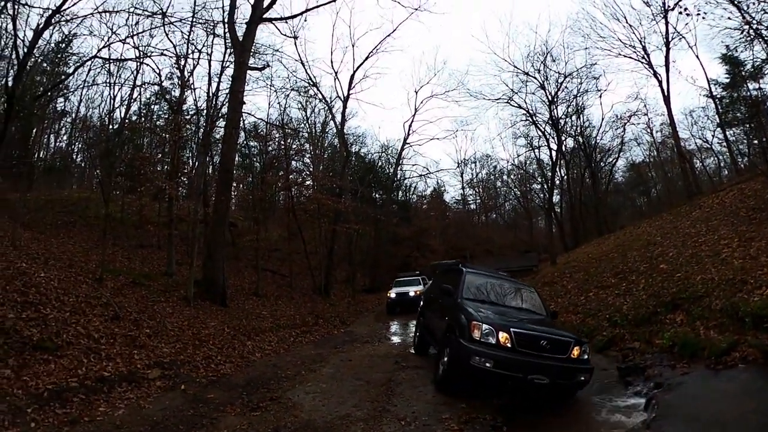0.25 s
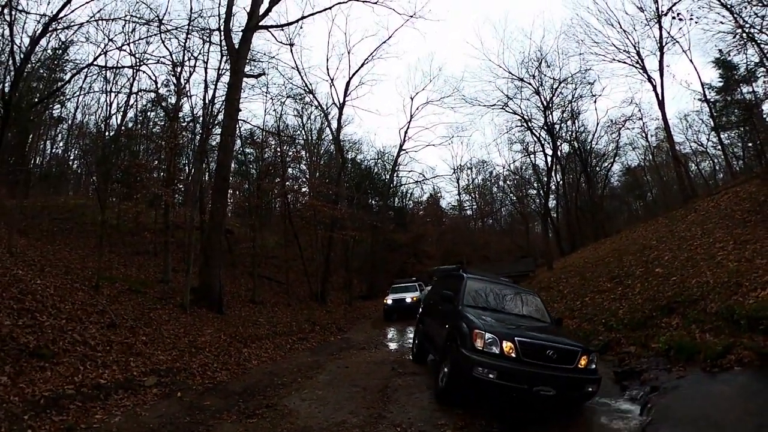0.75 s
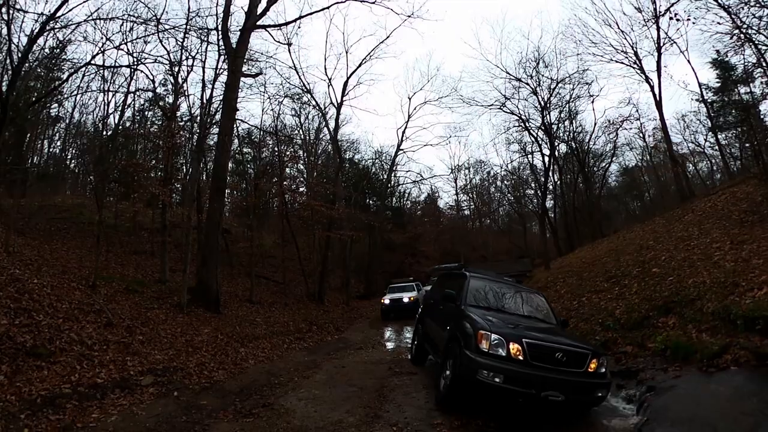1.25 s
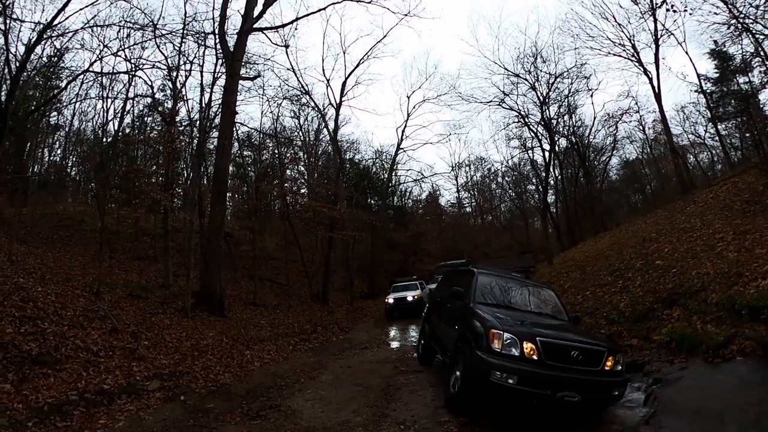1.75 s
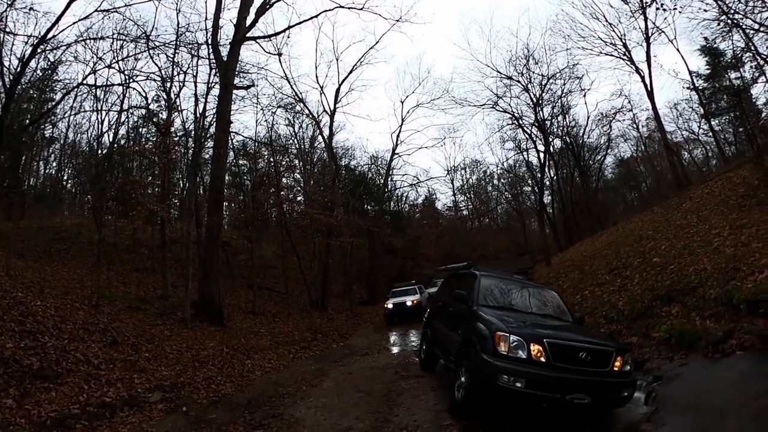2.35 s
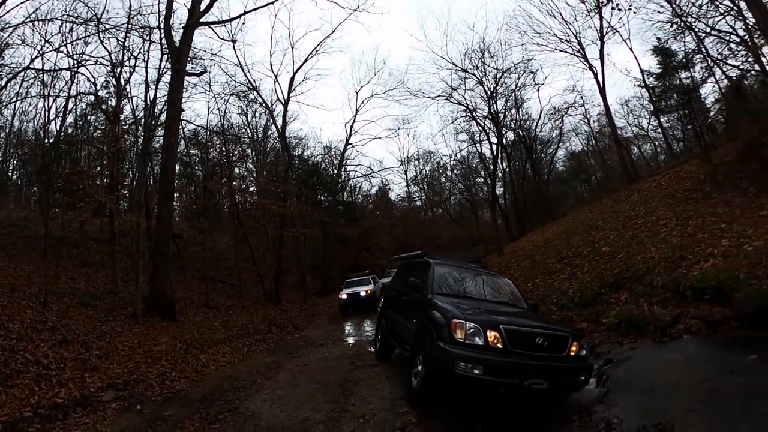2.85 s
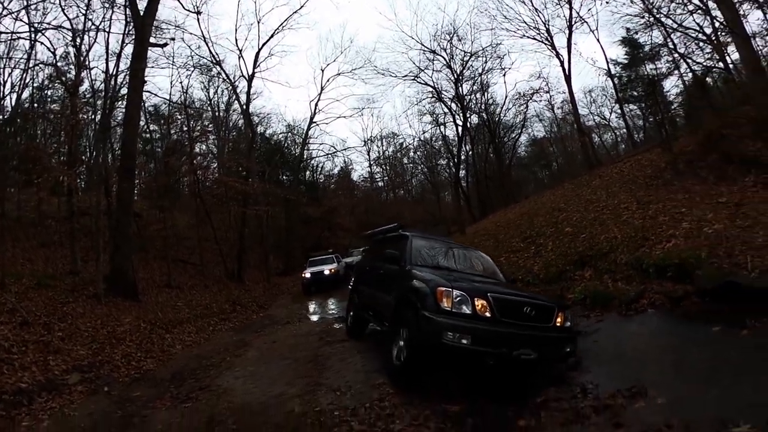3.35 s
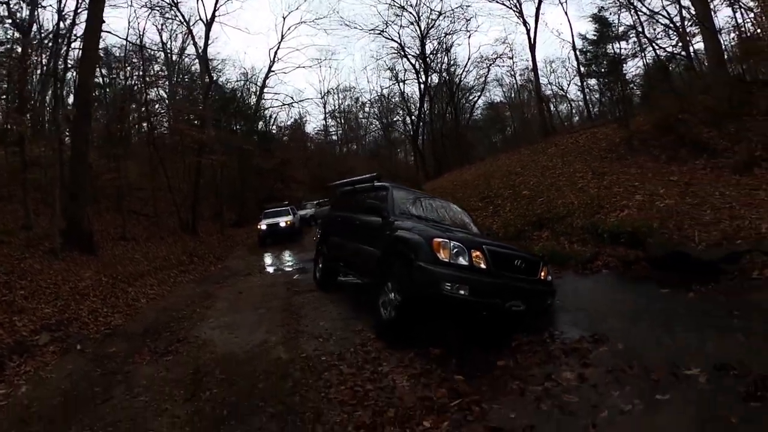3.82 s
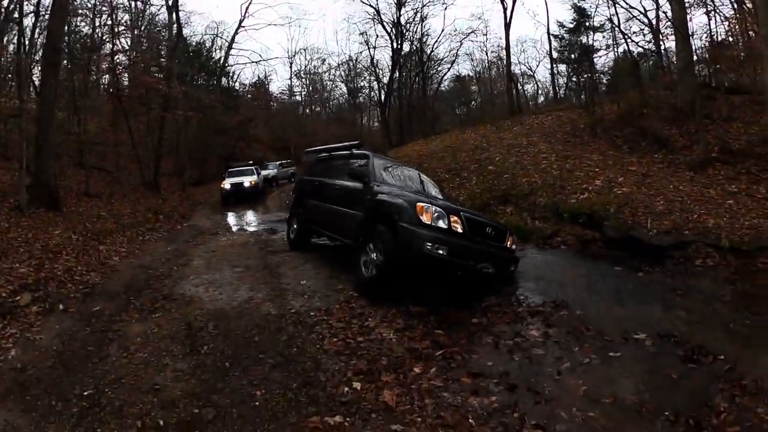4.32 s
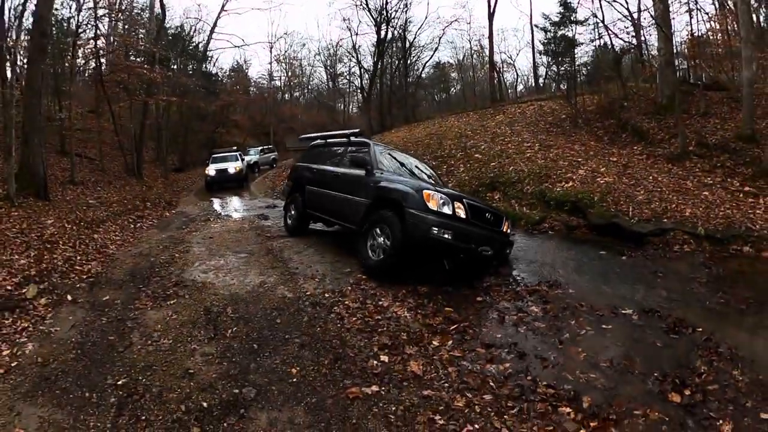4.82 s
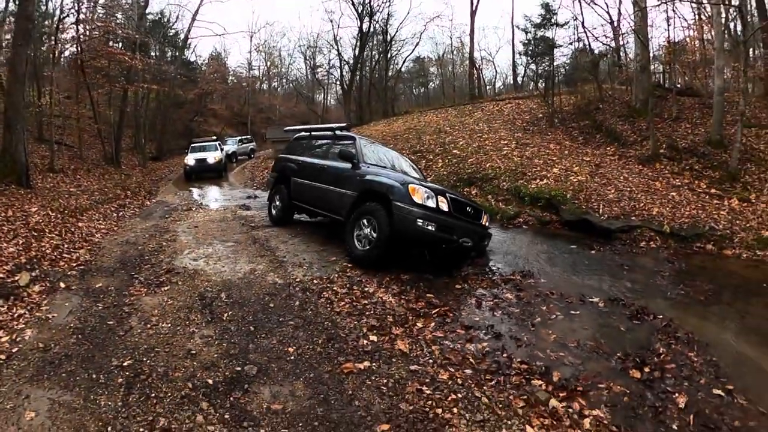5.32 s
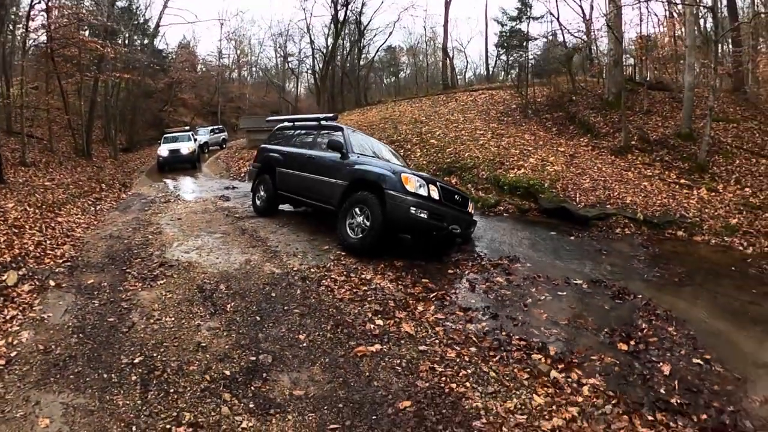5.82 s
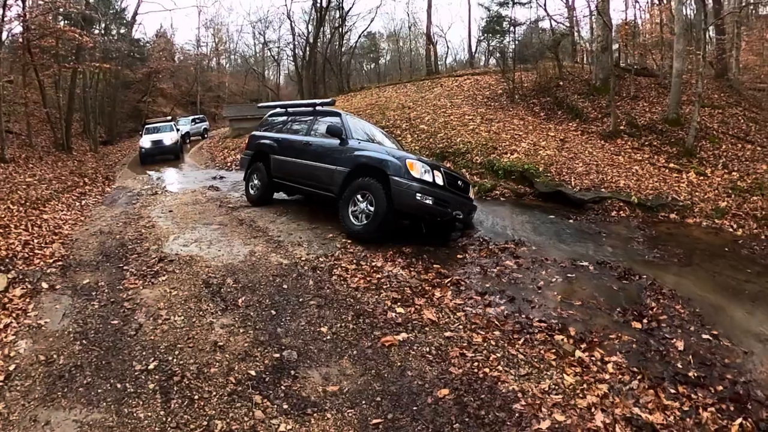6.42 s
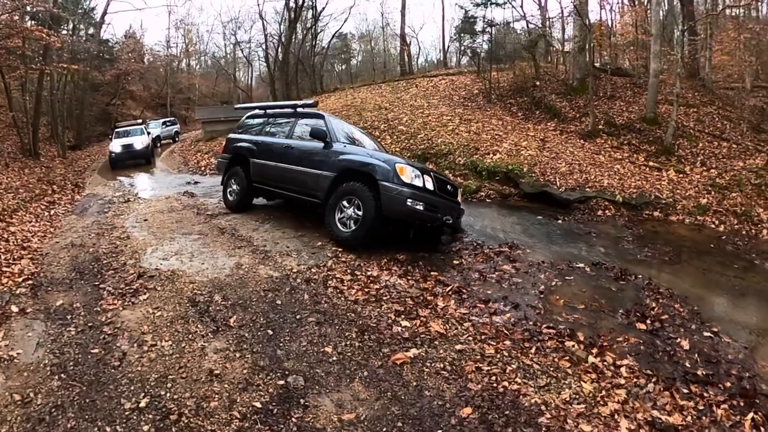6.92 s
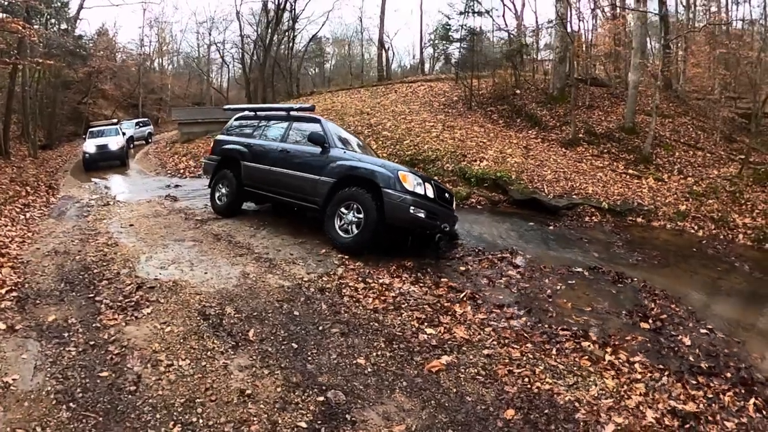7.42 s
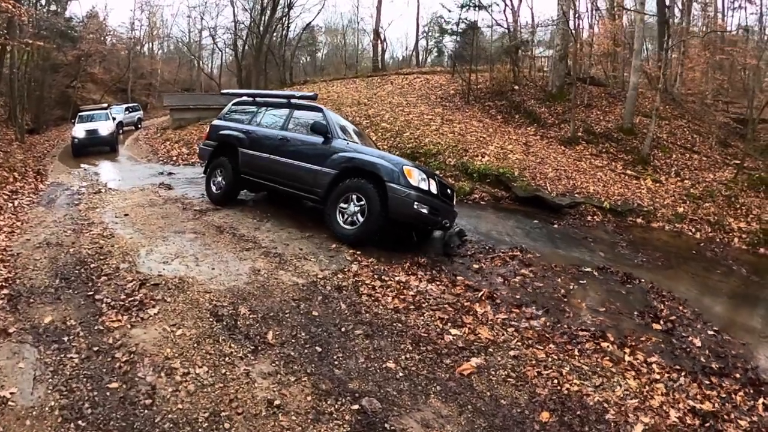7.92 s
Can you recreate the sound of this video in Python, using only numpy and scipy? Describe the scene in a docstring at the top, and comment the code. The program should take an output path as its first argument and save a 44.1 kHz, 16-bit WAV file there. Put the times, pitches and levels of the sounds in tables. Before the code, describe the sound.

A shallow creek gurgles, glugs and fizzes outdoors, heard from the bank, with a big V8 idling low underneath and a dull thud right at the start. At about 2.6 seconds the engine revs up into a deep, throbbing boom. Around 3.5 seconds a stone clacks sharply under a tyre, the suspension thuds and a rock rolls dully under water; more knocks and wet gravel crunches follow near 4 seconds. The throttle pushes again at 3.7 seconds and from 4.4 to 6, with a light exhaust rasp and rushing fan, while the creek grows quieter. Scattered stones knock and pebbles tick under the tread. The engine eases off after 6 seconds, then gives a last push from about 7.1 to 7.7. Gravel crunches build, peaking near 7.9 seconds with a few stone clacks and a brief hissing squirt of water.

```python
"""A big V8 throbs at idle over a gurgling forest creek, then the SUV crawls out in four pushes of throttle.
Firing pulses boom and rasp in the exhaust, and the fan rushes louder with the revs.
The creek is ringing bubbles and fizzing foam, steady until the body of the truck screens it.
Stones knock under the tyres, wet gravel crunches, and at the end the front digs in with a squirt."""
import sys
import numpy as np
from scipy import signal
from scipy.io import wavfile

SR = 44100
rng = np.random.default_rng(int(sys.argv[2]) if len(sys.argv) > 2 else 0)


def waveform_to_disk(signal):
    """Save audio, clipped to [-1, 1], as 16-bit WAV at the path in sys.argv[1]."""
    frames = np.transpose(np.atleast_2d(signal))
    scaled = np.clip(frames, -1, 1) * 32767
    samples = np.round(scaled).astype(np.int16)
    wavfile.write(sys.argv[1], SR, samples)


N = 360297
TIME = np.arange(N) / SR
IDLE_RPM, CRUISE_RPM = 589.6, 2000

# The driver's foot. Each row: press and release in seconds, rpm asked for at each, strain in dB.
THROTTLE_PUSHES = [(2.59, 3.461, 1094, 1028, 0), (3.694, 4.228, 1554, 1899, -4),
                   (4.389, 5.972, 1920, 2121, -2), (7.07, 7.746, 1723, 1622, -3.5)]

def throttle(travel_s=.28, off_load_db=-8, bark_db=11.5):
    """Revs and load lag behind the pedal; returns rpm, pedal (0-1) and the exhaust's effort in dB."""
    pedal, strain_db, asked_rpm = 0, 0, IDLE_RPM
    for press, release, first_rpm, last_rpm, db in THROTTLE_PUSHES:
        push = np.interp(TIME, [press, press + travel_s, release, release + travel_s], [0, 1, 1, 0])
        asked_rpm += push * (np.interp(TIME, [press, release], [first_rpm, last_rpm]) - IDLE_RPM)
        pedal = np.minimum(pedal + push, 1)
        strain_db += push * db
    rpm = lag(asked_rpm, up_s=.123, down_s=.428)
    load = lag(pedal, up_s=.0094, down_s=.52)
    speeding_up = np.maximum(asked_rpm / rpm - 1, 0)
    return rpm, pedal, off_load_db * (1 - load) + strain_db + bark_db * speeding_up

# The lope of the cross-plane V8. Each entry: relative strength in dB of one firing in the cycle.
FIRING_DB = [0, 4.5, -3.5, 3.5, 1.5, -0.5, -5.5, 6.5]

def firing_flow(cycle, rough_db=3, bank_lag_s=.001117):
    """Each firing sends a pulse and a puff of turbulence down the pipe."""
    firings = len(FIRING_DB) * cycle
    count = np.floor(firings).astype(int)
    cylinder = count % len(FIRING_DB)
    onsets = np.flatnonzero(np.diff(count)) + 1
    scatter_db = rough_db * rng.standard_normal(N)[:len(onsets)]
    pulses = np.zeros(N)
    pulses[onsets] = from_db(np.array(FIRING_DB)[cylinder[onsets]] + scatter_db)
    # the far bank has a longer way to the tailpipe, so its pulses come late
    far = np.isin(cylinder, [1, 3, 4, 6])
    pulses = pulses * ~far + np.interp(TIME - bank_lag_s, TIME, pulses * far)
    puffs = rng.standard_normal(N) * np.exp(-3 * (firings % 1))
    return rms_one(pulses / np.sqrt(np.gradient(cycle))) + .5 * rms_one(puffs)

# The fader ride of the firing tone, booming under load. Each row: time in seconds, level in dB.
BOOM_RIDE = [(0, -63), (2.6, -64), (2.75, -31.5), (2.92, -18.5), (3.25, -22), (3.5, -22.5), (3.63, -29.5),
             (3.92, -21.5), (4.1, -26.5), (4.27, -23), (4.48, -32), (4.78, -22.5), (5.05, -23), (5.2, -22),
             (5.45, -21.5), (5.58, -28.5), (5.73, -22.5), (5.89, -31), (6.05, -27), (6.18, -20.5),
             (6.3, -30), (6.5, -36.5), (7.1, -39.5), (7.22, -31), (7.3, -23.5), (7.45, -27.5), (8.17, -31)]
# The throb around the firing tone. Each row: multiple of the engine cycle, relative level in dB.
THROB_ORDERS = [(3, -1), (4, -15), (5, -1.5), (6, -16), (7, -15.5), (9, -20), (10, -17.5), (11, -17.5),
                (12, -17), (13, -18.5), (14, -16.5), (16, -11.5), (21, -15), (43, -20), (45, -18.5),
                (49, -20)]
# What the silencer lets through. Each row: frequency in Hz, gain in dB.
SILENCER_EQ = [(30, -44), (40, -40), (46, -34), (51, -29), (57, -25.5), (66, -24.5), (76, -22.5), (89, -28),
               (118, -18.5), (131, -24.5), (180, -35.5), (210, -29.5), (232, -27.5), (260, -36.5),
               (290, -38)]

def exhaust_tones(cycle, effort_db):
    """Eight firings a cycle boom; the uneven banks add tones that swell at the silencer's resonances."""
    cycle_hz = np.gradient(cycle) * SR
    boom_db, = in_time(BOOM_RIDE)
    out = tone(cycle, len(FIRING_DB), boom_db + 1.3 * drift(12.4))
    for order, db in THROB_ORDERS:
        waver_db = (.25 - .12 * db) * drift(6.9)   # faint tones waver most
        out += tone(cycle, order, effort_db + db + at_hz(SILENCER_EQ, order * cycle_hz) + waver_db)
    return out

# The hollow ring of the pipe. Each row: centre in Hz, width in Hz, relative level in dB.
PIPE_MODES = [(76.4, 44, 1), (136.5, 90, 1.5), (206, 49, 1), (418, 93, -11), (890, 300, -16),
              (1405, 99, -18)]

def exhaust_rasp(cycle, rasp_db, gap_hz, pipe_db=-2, growl_db=-4):
    """The firings ring in the pipe and growl in the gap under the body."""
    flow = firing_flow(cycle)
    pipe = sum((-1) ** k * from_db(db) * resonate(flow, hz, width)
               for k, (hz, width, db) in enumerate(PIPE_MODES))
    swirl = flow + .6 * rng.standard_normal(N)   # steady turbulence keeps the growl diffuse
    growl = swept_band(swirl, gap_hz, width_hz=190)
    return from_db(rasp_db) * (from_db(pipe_db) * rms_one(pipe) + from_db(growl_db) * growl)

# The singing edge of the growl. Each row: multiple of the engine cycle, relative level in dB.
GROWL_ORDERS = [(30, -14.5), (31, -9.5), (32, -14.5), (34, -12.5)]

def growl_tones(cycle, rasp_db, gap_hz, width_hz=65):
    """Clean high orders swell and beat as they pass the resonance of the gap under the body."""
    cycle_hz = np.gradient(cycle) * SR
    out = np.zeros(N)
    for order, db in GROWL_ORDERS:
        partial = tone(cycle + .0041 * drift(18), order, rasp_db + db + 2.5 * drift(10))
        out += partial / np.hypot(1, (order * cycle_hz - gap_hz) / width_hz)
    return out

def combustion_rumble(effort_db):
    """Unsteady combustion rumbles under the tones, heavier with effort."""
    return from_db(-37 + .58 * effort_db) * rms_one(cut(rng.standard_normal(N), [45, 140], "band"))

# The colour of the fan's rush. Each row: frequency in Hz, relative noise density in dB.
FAN_SPECTRUM = [(500, -14), (850, 3), (972, -6.5), (1140, -3.5), (1470, -7), (2040, -6), (2630, -11),
                (3520, -14.5), (4890, -21.5), (6160, -23.5), (9310, -35.5), (10600, -46.5), (12600, -38),
                (15500, -53.5)]
# The whir of intake and engine bay. Each row: centre in Hz, width in Hz, relative level in dB.
BAY_MODES = [(875, 200, -8), (1470, 140, -14.5), (2597, 440, -9.5), (3910, 190, -27), (4210, 230, -23),
             (6150, 520, -28.5), (7660, 240, -31), (8900, 1200, -32), (12300, 600, -37.5)]

def fan(cycle, fan_db, pulse_depth=.043):
    """Air rushes through the radiator and intake, pulsing with the firings, and whirs in the bay."""
    pulsing = 1 + pulse_depth * np.cos(2 * np.pi * len(FIRING_DB) * cycle)
    air = coloured(rng.standard_normal((2, N)), FAN_SPECTRUM, flicker_db=2)
    flow = rng.standard_normal(N)
    whir = sum(from_db(db) * rms_one(resonate(resonate(flow, hz, width), hz, width))
               for hz, width, db in BAY_MODES)
    return from_db(fan_db) * pulsing * bay_reflections(air + whir)

def intake_hiss(airflow):
    """Air hisses past the throttle plate as soon as the pedal is down."""
    hiss = cut(cut(rng.standard_normal(N), 5500, "high"), 9500, "low", order=4)
    return from_db(-68) * airflow * rms_one(bay_reflections(hiss))

# Tight slaps inside the engine bay. Each row: delay in seconds, gain in dB.
BAY_ECHOES = [(.00231, -26.5), (.00589, -15)]

def bay_reflections(x):
    """Nearby surfaces comb the treble."""
    treble = cut(x, 2700, "high")
    return x + sum(from_db(db) * np.interp(TIME - s, TIME, treble) for s, db in BAY_ECHOES)

# Stone hits. Each row: start in seconds, ring level in dB, low-end weight in dB, pitch ratio,
# grit level in dB; all levels are relative.
STONE_KNOCKS = [(0.726, -30, -17, 1.36, -19.5), (3.417, -1.5, -11, 0.93, -20),
                (3.474, -15.5, -12, 0.8, -38), (3.597, -24, -9, 0.96, -36), (3.875, -20.5, -27, 0.9, -19),
                (3.908, -8, -16.5, 0.86, -17.5), (4.565, -29, -5, 0.95, -29), (4.704, -25, -1, 0.83, -29),
                (4.946, -25, -8, 0.74, -29), (5.436, -31, -4, 0.73, -28), (5.472, -27, -8, 0.53, -28),
                (5.848, -22, -2, 0.58, -30), (7.051, -22.5, -15, 0.67, -33), (7.072, -18.5, -36, 0.55, -27),
                (7.196, -24.5, -20, 0.68, -16), (7.679, -13, -27, 0.92, -36), (7.852, -16, -9, 1, -19),
                (7.866, -15.5, -6, 1.083, -27), (7.882, -15.5, -9, 0.88, -25)]
# The voice of a stone. Each row: Hz at pitch ratio 1, relative level in dB, seconds to fall 60 dB.
STONE_MODES = [(349, -7, 0.05), (620, 0, 0.0052), (937, -3, 0.053), (1340, -1.5, 0.0096), (1494, 5, 0.011),
               (1710, -1.5, 0.0027), (2410, -21, 0.016)]

def stone_knocks(ring_db=-7, slip_s=.00187, slip_db=-2):
    """Wet stones clack under the tyres with a burst of grit, slip and catch again."""
    clacks, t = np.zeros(N), TIME[:SR // 100]
    for s, db, weight_db, pitch, grit_db in STONE_KNOCKS:
        grit = rng.standard_normal(len(t)) * np.exp(-t / .0015)
        add(clacks, s, from_db(grit_db) * cut(grit, [700, 2800], "band", order=3))
        for k, (hz, mode_db, t60) in enumerate(STONE_MODES):
            colour_db = (weight_db + 7.5) * np.log2(1500 / hz) / 2
            for delay, contact_db in [(0, 0), (slip_s, slip_db)]:
                level_db = db + ring_db + mode_db + colour_db + contact_db + rng.standard_normal()
                add(clacks, s + delay, (-1) ** k * from_db(level_db) * ping(pitch * hz, t60))
    return cut(clacks, 3200, "low")

# Suspension jolts. Each row: start in seconds, level in dB, brightness in dB per octave.
JOLTS = [(.087, -17, 4.5), (3.419, -26.5, 24), (3.444, -24, 7), (3.476, -14, -3), (3.499, -20, 5),
         (3.565, -22.5, 7), (7.029, -24.5, -4), (7.842, -25, -1), (7.88, -26, -6)]
# The boom of the chassis. Each row: pitch in Hz, relative level in dB, seconds to fall 60 dB.
CHASSIS_MODES = [(36, -11, 0.37), (88.4, -4, 0.32), (172.5, -2, 0.094), (319, -9.5, 0.021)]

def chassis_thuds():
    """Each jolt of the suspension sets the chassis ringing low and dull."""
    thuds = np.zeros(N)
    for s, db, tilt_db in JOLTS:
        for hz, mode_db, t60 in CHASSIS_MODES:
            add(thuds, s, from_db(db + mode_db + tilt_db * np.log2(hz / 150)) * ping(hz, t60))
    return cut(thuds, 1000, "low")

# One small bright splash in the creek, then gravel crunches.
# Each row: peak time and fall in seconds, level in dB, brightness in dB per octave.
SPLASH_AND_CRUNCHES = [(.572, 0.023, -47, 8), (3.477, 0.014, -44, -4), (3.616, 0.015, -42, 10.5),
                       (3.826, 0.042, -33, 3), (3.919, 0.035, -34.5, -0.5), (4.04, 0.076, -35.5, 3.5),
                       (6.509, 0.029, -47, -10.5), (6.95, 0.046, -43, 2.5), (7.06, 0.06, -41, 3.5),
                       (7.399, 0.035, -38.5, 4), (7.501, 0.0092, -35.5, 3.5), (7.701, 0.042, -34.5, 4.5),
                       (7.79, 0.048, -36, 4), (7.85, 0.037, -25, 0.5), (7.882, 0.033, -28, 4.5)]
# The colour of crushed gravel. Each row: frequency in Hz, relative noise density in dB.
GRAVEL_SPECTRUM = [(330, -8), (700, 5.5), (1300, 13.5), (1700, 6), (2100, -24), (3200, -1.5), (4200, -13.5),
                   (5200, -15.5), (6500, -22.5), (9000, -35.5), (12000, -55), (15500, -49)]
# The clang of the skid plate. Each row: centre in Hz, width in Hz, relative level in dB.
SKID_PLATE_MODES = [(390, 54, 2), (540, 84, 22), (976, 180, 10), (1410, 140, -11)]

def splash_and_crunches(rise_share=.77):
    """Bursts of tiny clicks: a small splash, then tyres crunching wet gravel that rings the skid plate."""
    bursts = np.array([from_db(db) * swell(s, rise_share * fall, fall)
                       for s, fall, db, _ in SPLASH_AND_CRUNCHES]) + 1e-9
    level = bursts.sum(axis=0)
    tilt_db = np.array(SPLASH_AND_CRUNCHES)[:, -1] @ bursts / level   # the loudest burst leads the colour
    collisions = [grains(per_s=2200, spread_db=4) for _ in range(2)]
    crush = coloured(collisions, GRAVEL_SPECTRUM, flicker_db=2, tilt_db=tilt_db)
    ring = sum(from_db(db) * resonate(collisions[0], hz, width) for hz, width, db in SKID_PLATE_MODES)
    plate = from_db(-tilt_db) * rms_one(ring)   # coarse, dull stones shake the plate most
    return level * (from_db(-5) * crush + .5 * cut(plate, 2400, "low"))

def tread_crackle(level_db):
    """Once the wheels turn, single stones crack under the tread."""
    turning = np.interp(TIME, [3.7, 3.9], [0, 1])
    cracks = coloured([grains(per_s=240, spread_db=2)], GRAVEL_SPECTRUM, flicker_db=2)
    return turning * from_db(level_db) * cracks

# The lurches of a rock. Each row: peak time, rise and fall in seconds, level in dB.
ROCK_LURCHES = [(3.505, 0.056, 0.017, -24.5), (3.575, 0.029, 0.064, -26.5)]
# Its muffled colour. Each row: frequency in Hz, relative noise density in dB.
ROCK_SPECTRUM = [(82, -32), (140, 6.5), (318, -1), (346, -3), (673, -1), (934, -68), (1010, -27),
                 (1400, -27.5), (1820, -41), (3080, -120)]

def rolling_rock():
    """A rock rolls over under water in a cluster of dull bumps."""
    return swells(ROCK_LURCHES) * coloured([grains(per_s=220, spread_db=1.5)], ROCK_SPECTRUM)

# Drops and flicked pebbles. Each row: start in seconds, relative level in dB, pitch in Hz.
PEBBLE_TICKS = [(0.573, -28, 3850), (3.807, -29, 5300), (3.876, -34, 6200), (4.0, -34, 6000),
                (4.073, -29, 3800), (4.119, -33, 3600), (4.314, -34, 5860), (4.518, -29, 3700),
                (4.777, -26, 4000), (4.84, -32, 3500), (5.523, -29, 4300), (5.565, -30, 5300),
                (5.666, -35, 3800), (5.866, -33, 5400), (7.118, -40, 5600), (7.728, -38, 5900),
                (7.76, -25, 3700)]

def pebbles(trim_db=-12, decay_s=.003, width_share=.12):
    """Small stones and drops tick with a dry burst around their own pitch."""
    out, t = np.zeros(N), TIME[:SR // 25]
    for s, db, hz in PEBBLE_TICKS:
        burst = rms_one(resonate(rng.standard_normal(len(t)), hz, width_share * hz))
        add(out, s, from_db(db + trim_db) * burst * np.exp(-t / decay_s))
    return cut(out, 8000, "low")

# The sweep of the water jet. Each row: time in seconds, pitch in Hz, level in dB.
JET_SWEEP = [(7.72, 3383, -81), (7.76, 3550, -50), (7.83, 4240, -55), (7.895, 5360, -41.5),
             (7.94, 5490, -78)]

def squirt():
    """A thin jet hisses from under the front tyre, rising in pitch as the tyre closes its gap."""
    hz, db = in_time(JET_SWEEP)
    gate = (TIME > JET_SWEEP[0][0]) * (TIME < JET_SWEEP[-1][0])
    return from_db(db) * swept_band(rng.standard_normal(N), hz, width_hz=700) * gate

# The sheen on the last crunch. Each row: peak time, rise and fall in seconds, level in dB.
MIST_PUFFS = [(7.868, .03, 0.033, -59)]

def mist():
    """A brief cloud of fine drops hisses as the front digs in."""
    return swells(MIST_PUFFS) * rms_one(cut(grains(per_s=6000, spread_db=7), [6500, 13000], "band"))

# The creek's faders, dipping as the truck screens it. Each row: time in seconds, gurgle and spray in dB.
CREEK_RIDE = [(0, -34, -54), (.6, -35.5, -49.5), (1.1, -34, -49), (1.9, -35.5, -50.3), (3.45, -34.5, -49.5),
              (3.75, -39.5, -58), (4.3, -42.5, -59), (6.1, -42, -69), (6.7, -43.5, -61), (8.17, -50, -59.5)]

def creek(gap_hz):
    """Water tumbles over rocks: fizzing foam, gurgling bubbles and a few gulps."""
    gurgle_db, spray_db = in_time(CREEK_RIDE)
    return spray(spray_db, gap_hz) + from_db(gurgle_db) * gurgle() + gulps()

# The colour of the gurgle. Each row: bubble pitch in Hz, relative density in dB.
GURGLE_SPECTRUM = [(76, -46), (130, -40), (161, -1.5), (226, 2), (329, -7.5), (394, -6), (462, -47),
                   (529, -17.5), (667, -10), (776, -11), (1100, -25.5), (1430, -59), (2420, -120)]

def gurgle(count=7000, ring_cycles=22):
    """Bubbles of all sizes ring briefly and rise in pitch as they surface."""
    out = np.zeros(N)
    for when, pitch, faintness in rng.random((count, 3)):
        hz = 120 * 8.5 ** pitch
        level_db = at_hz(GURGLE_SPECTRUM, hz) + 20 * np.log10(hz) - 2.4 * np.log(faintness + .16)
        add(out, when * N / SR, from_db(level_db) * ping(hz, ring_cycles / hz, glide=.17))
    return rms_one(cut(out, 927, "low", order=4))

# The fizz of foam. Each row: frequency in Hz, relative noise density in dB.
FOAM_SPECTRUM = [(900, -6), (1200, 5.5), (1800, 7), (2500, -1), (3000, -7.5), (3500, 1.5), (4300, -10.5),
                 (5400, -11), (6400, -5), (7700, -6), (8500, -14.5), (9300, -25), (11000, -31.5),
                 (15000, -49.5)]
# Its ring under the body. Each row: ratio to the gap's pitch, width in Hz, relative level in dB.
UNDERBODY_MODES = [(3.15, 490, -9), (4.55, 478, -15)]

def spray(spray_db, gap_hz):
    """Foam bursts in thousands of tiny clicks, and the spray rings in the gap under the body."""
    pops = [grains(per_s=12000, spread_db=5) for _ in range(2)]
    ring = sum(from_db(db) * swept_band(grains(per_s=9000, spread_db=3.5), ratio * gap_hz, width)
               for ratio, width, db in UNDERBODY_MODES)
    return from_db(spray_db + .65 * drift(3)) * (coloured(pops, FOAM_SPECTRUM, flicker_db=2) + ring)

# Big single bubbles. Each row: start in seconds, level in dB, starting pitch in Hz.
AIR_POCKETS = [(.047, -26, 760), (.089, -22, 597), (.234, -27.5, 720), (.257, -29, 624), (1.008, -26, 650),
               (1.044, -25, 670), (1.072, -18.5, 674), (1.128, -19, 745), (3.497, -23, 660),
               (3.548, -20, 500), (3.568, -20, 560), (3.595, -17.5, 650)]

def gulps():
    """Large air pockets ring in the water with a short upward chirp."""
    out = np.zeros(N)
    for s, db, hz in AIR_POCKETS:
        add(out, s, from_db(db) * ping(hz, t60=.025, glide=.069))
    return cut(out, 1050, "low")

# Water glugs and, last, one brief tyre groan. Each row: start and length in seconds,
# first and last pitch in Hz before detuning, level in dB.
GLUGS_AND_GROAN = [(.09, 0.15, 336.7, 380, -39), (.58, 0.09, 326, 448, -37), (.7, 0.26, 245, 200.6, -40),
                   (.98, .24, 210.2, 267, -34.5), (1.6, 0.16, 226.7, 161, -36.5),
                   (1.73, 0.13, 166.6, 215.6, -36), (2.03, 0.22, 256, 234.7, -36),
                   (6.43, .15, 850, 895, -46)]

def glugs_and_groan(detune=.96):
    """Gliding, fluttering tones: water glugs between the rocks, and a tyre scrubs once on stone."""
    out = np.zeros(N)
    for s, length, first_hz, last_hz, db in GLUGS_AND_GROAN:
        hz = np.linspace(first_hz, last_hz, int(length * SR))
        glide = tone(np.cumsum(hz) / SR, detune, db + 3 * drift(33)[:len(hz)])
        add(out, s, np.hanning(len(hz)) * glide)
    return out

def forest(x, t60=.94, wet_db=-27):
    """Banks and tree trunks scatter a faint, dull tail."""
    t = TIME[:SR]
    tail = cut(rng.standard_normal(SR), 3000, "low") * np.exp(-np.log(1000) * t / t60) * (t > .008)
    return x + from_db(wet_db) * signal.fftconvolve(x, tail / np.linalg.norm(tail))[:N]

def from_db(db):
    """Decibels to gain."""
    return 10 ** (np.asarray(db) / 20)

def rms_one(x):
    """Scale to rms 1."""
    return x / np.sqrt(np.mean(x ** 2) + 1e-20)

def in_time(rows):
    """One automation curve for each column after the time."""
    s, *columns = np.transpose(rows)
    return [np.interp(TIME, s, column) for column in columns]

def at_hz(spectrum, hz):
    """Read a spectrum's dB on a log-frequency axis."""
    points_hz, db = np.transpose(spectrum)
    return np.interp(np.log(hz), np.log(points_hz), db)

def cut(x, hz, kind, order=2):
    """Butterworth filter."""
    sos = signal.butter(order, np.clip(hz, 10, .45 * SR), kind, fs=SR, output="sos")
    return signal.sosfilt(sos, x + 1e-18)

def drift(rate_hz, step=40):
    """A smooth random wobble of rms 1."""
    r = np.exp(-2 * np.pi * rate_hz * step / SR)
    slow = signal.lfilter([1], [1, -2 * r, r * r], rng.standard_normal(N // step + 2002))[2000:]
    return np.interp(np.arange(N) / step, np.arange(len(slow)), rms_one(slow))

def lag(x, up_s, down_s, step=147):
    """Follow a control with separate attack and release times."""
    out = [x[0]]
    for aim in x[step::step]:
        lag_s = up_s if aim > out[-1] else down_s
        out.append(aim + (out[-1] - aim) * np.exp(-step / SR / lag_s))
    return np.interp(TIME, TIME[::step], out)

def resonate(x, hz, width_hz):
    """A resonance with gain 1 at its peak."""
    r = np.exp(-np.pi * width_hz / SR)
    poles = [1, -2 * r * np.cos(2 * np.pi * hz / SR), r * r]
    return signal.lfilter(np.array([1, 0, -1]) * (1 - r * r) / 2, poles, x)

def swept_band(x, hz, width_hz, block=128):
    """Two passes through a resonance whose centre moves; rms 1."""
    out, r = x.copy(), np.exp(-np.pi * width_hz / SR)
    for _ in range(2):
        state = np.zeros(2)
        for i in range(0, N, block):
            poles = [1, -2 * r * np.cos(2 * np.pi * hz[i] / SR), r * r]
            out[i:i + block], state = signal.lfilter([1 - r, 0, r - 1], poles, out[i:i + block], zi=state)
    return rms_one(out)

def tone(cycle, order, db):
    """A sine on a multiple of a cycle, at a random phase."""
    return from_db(db) * np.sqrt(2) * np.sin(2 * np.pi * (order * cycle + rng.random()))

def ping(hz, t60, glide=0):
    """A dying sine whose pitch rises by the share glide within its ring time."""
    t = np.arange(int(t60 * SR) + 1) / SR
    return np.sin(2 * np.pi * hz * t * (1 + glide * t / t60 / 2)) * np.exp(-np.log(1000) * t / t60)

def grains(per_s, spread_db):
    """Random clicks, most small and a few large; rms 1."""
    onsets = np.flatnonzero(rng.random(N) < per_s / SR)
    size = np.minimum(rng.exponential(1, N)[onsets], 4)
    clicks = np.zeros(N)
    clicks[onsets] = from_db(spread_db * size) * np.sign(rng.standard_normal(N)[onsets])
    return rms_one(clicks)

def coloured(sources, spectrum, flicker_db=0, tilt_db=0):
    """Third-octave bands, fed in turn by the sources, each with its own flicker; rms 1."""
    bottom, top = spectrum[0][0], spectrum[-1][0]
    edges = np.geomspace(bottom, top, round(3 * np.log2(top / bottom)) + 1)
    out = np.zeros(N)
    for k, (low, high) in enumerate(zip(edges, edges[1:])):
        hz = np.sqrt(low * high)
        gain_db = at_hz(spectrum, hz) + flicker_db * drift(23) + tilt_db * np.log2(hz / 1500)
        out += from_db(gain_db) * cut(sources[k % len(sources)], [low, high], "band")
    return rms_one(out)

def swell(s, rise, fall):
    """A rounded rise to 1 at time s, then a tapering fall."""
    return np.exp(-np.where(TIME < s, ((TIME - s) / rise) ** 2, (np.abs(TIME - s) / fall) ** 1.34))

def swells(rows):
    """One envelope from a table of swells."""
    return sum(from_db(db) * swell(s, rise, fall) for s, rise, fall, db in rows)

def add(out, s, sound):
    """Mix a sound in at time s."""
    i = max(int(s * SR), 0)
    out[i:i + len(sound)] += sound[:max(N - i, 0)]

# The truck turning and climbing. Each row: time in seconds, pitch of the gap under the body in Hz,
# exposure of the exhaust in dB, exposure of the fan in dB.
TRUCK_POSE = [(0, 800, -3, 1.5), (2.7, 728, -4.5, 1), (3.5, 631, 0, -5.5), (4.55, 526, 2, 1),
              (4.8, 507, -0.5, 1.5), (5.75, 539, 5.5, 2), (6.15, 480, 1.5, 2), (6.5, 460, 4, -1.5),
              (7.45, 503, -5, -2.5), (8.17, 540, -5, -0.5)]

def scene():
    """Engine, stones and creek as heard from the bank."""
    rpm, pedal, effort_db = throttle()
    gap_hz, exhaust_open_db, fan_open_db = in_time(TRUCK_POSE)
    rev_octaves = np.log2(rpm / CRUISE_RPM)
    throttle_shut = 1 - lag(pedal, up_s=.04, down_s=.051)
    rasp_db = -36 + 4 * rev_octaves + .42 * effort_db + exhaust_open_db
    fan_db = -43 + 5 * rev_octaves - 2 * throttle_shut + fan_open_db
    cycle = np.cumsum(rpm * (1 + .003 * drift(10))) / (2 * 60 * SR)   # two crank turns make one cycle
    engine = exhaust_tones(cycle, effort_db) + exhaust_rasp(cycle, rasp_db, gap_hz)
    engine += growl_tones(cycle, rasp_db, gap_hz) + fan(cycle, fan_db)
    engine += intake_hiss(pedal * rpm / CRUISE_RPM) + combustion_rumble(effort_db)
    ground = stone_knocks() + chassis_thuds() + pebbles() + splash_and_crunches() + rolling_rock()
    ground += tread_crackle(fan_db - 10)   # harder as the engine pulls
    ground += squirt() + mist()
    return (engine + creek(gap_hz) + glugs_and_groan() + forest(ground))[None]

def record(dry):
    """The microphone loses the deepest bass and the very top."""
    top_cut = signal.ellip(10, .1, 80, 15700, fs=SR, output="sos")
    return signal.sosfilt(top_cut, cut(dry, 8.3, "high"))

dry = scene()
out = record(dry)
waveform_to_disk(out)
```